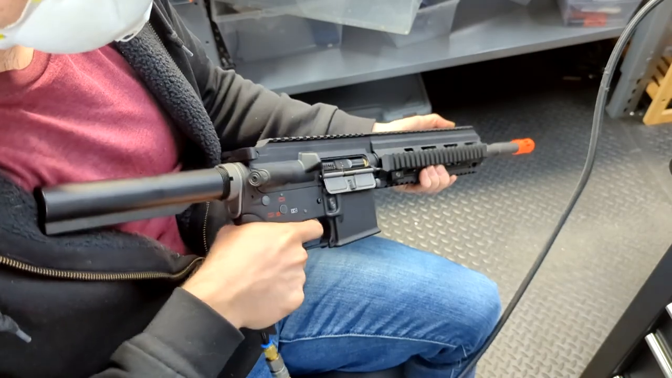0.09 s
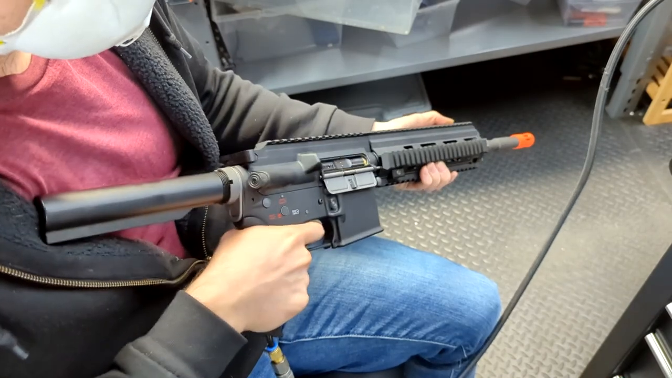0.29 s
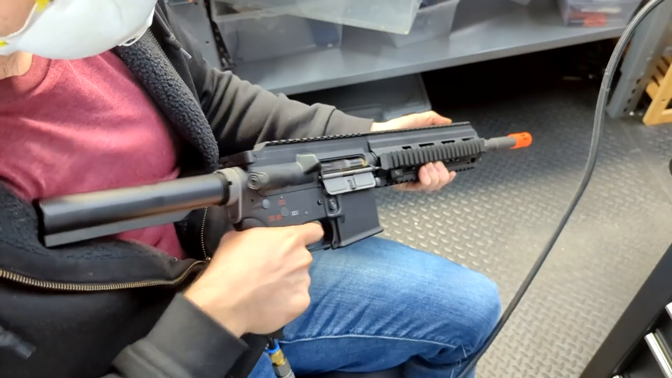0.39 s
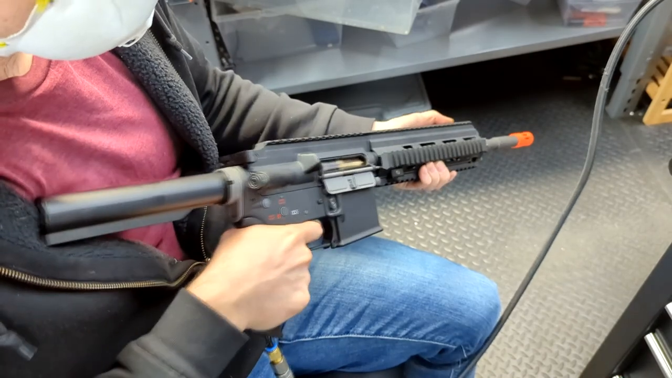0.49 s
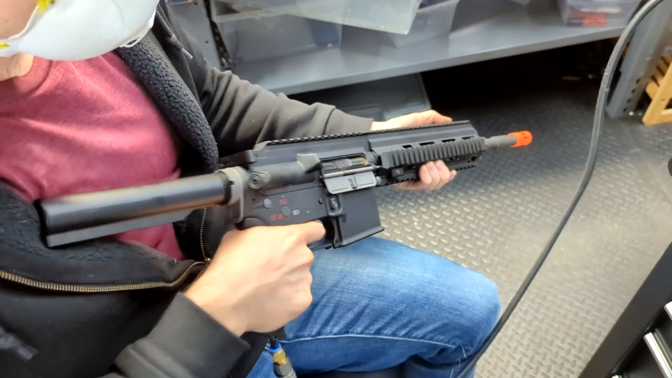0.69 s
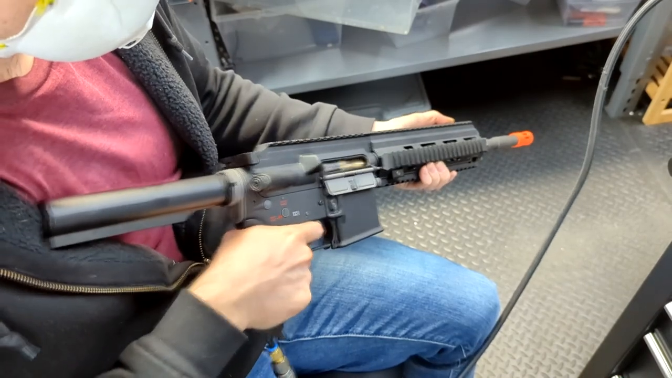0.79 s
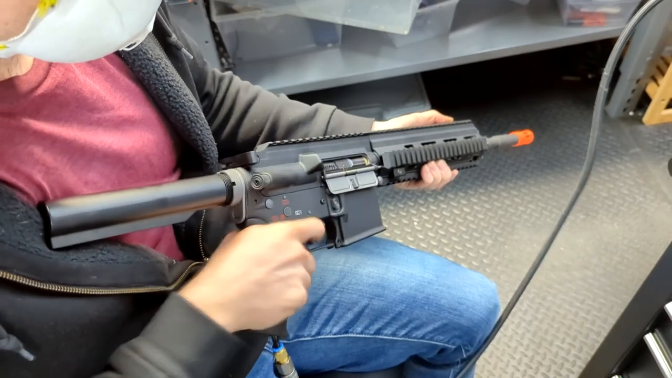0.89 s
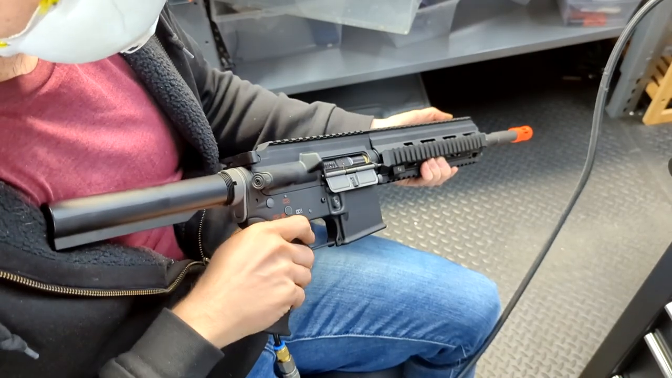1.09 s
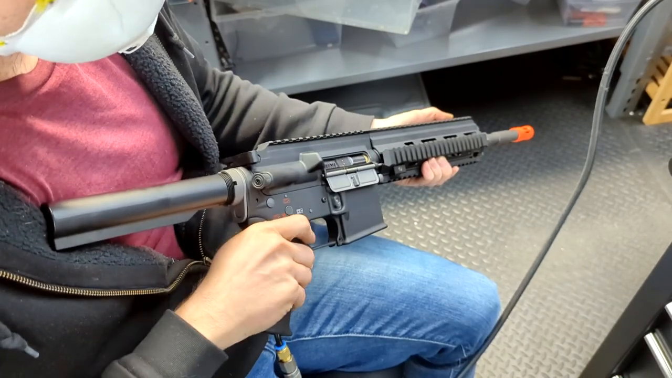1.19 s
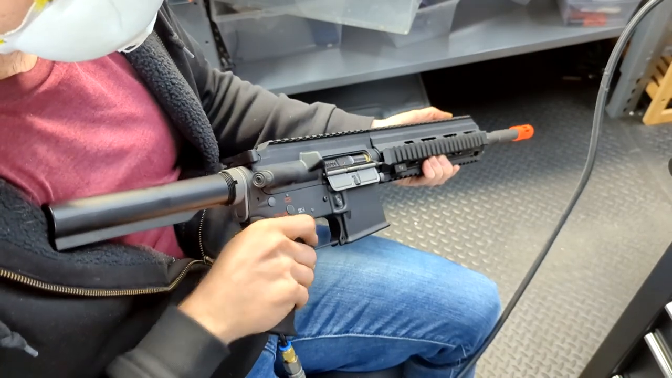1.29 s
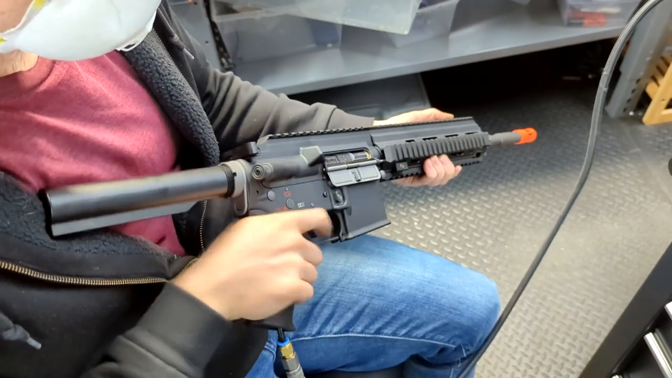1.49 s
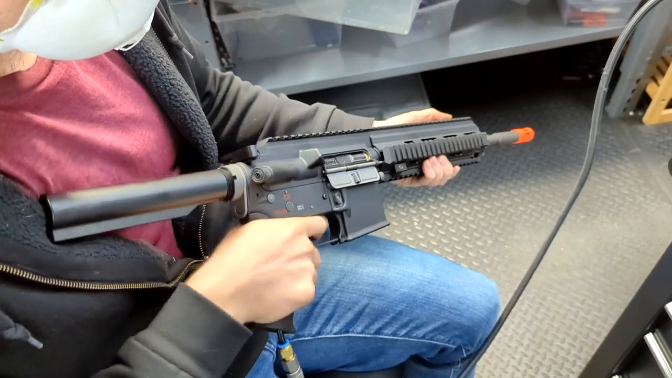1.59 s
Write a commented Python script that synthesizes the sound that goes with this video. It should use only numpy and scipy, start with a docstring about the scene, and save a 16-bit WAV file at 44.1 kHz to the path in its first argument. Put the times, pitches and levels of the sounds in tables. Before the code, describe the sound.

A gas airsoft rifle, close to a stereo microphone in a hard indoor workshop, clicks at the trigger, rattles off five even pops with metallic bolt clatter, then echo fades and the trigger clicks again.

```python
"""Five sharp pops in quick succession: a gas blowback airsoft rifle on full auto, close by in a hard-walled
workshop. Each pop is a noise crack with a big echo, two low sine surges of gas under it, and a clatter of
hammer and bolt made of noise bursts, ringing metal modes and dull knocking modes. Small trigger clicks come
before and after the shots. A faint hum, handling bumps and low room noise lie underneath. The recorder's
limiter ducks at every pop and lets go slowly, so the room's echo swells between the shots."""
import sys
import numpy as np
from scipy import signal
from scipy.fft import rfft, irfft, next_fast_len
from scipy.io import wavfile
from scipy.ndimage import uniform_filter1d, minimum_filter1d

SR = 44100
rng = np.random.default_rng(int(sys.argv[2]) if len(sys.argv) > 2 else 0)


def waveform_to_disk(signal):
    """Save audio, clipped to [-1, 1], as 16-bit WAV at the path in sys.argv[1]."""
    frames = np.transpose(np.atleast_2d(signal))
    scaled = np.clip(frames, -1, 1) * 32767
    samples = np.round(scaled).astype(np.int16)
    wavfile.write(sys.argv[1], SR, samples)


N = 70560  # length in samples

# the five shots: t/s, level/dB (the thumps and the action follow them too)
SHOT_TIMES = [(0.2389, -4.5), (0.4031, -4.5), (0.5525, -6), (0.7011, -6), (0.8508, -5.5)]
# colour of the direct pop: f/Hz, level/dB
POP_COLOUR = [(40, -40), (100, -37), (300, -4.5), (700, -0.5), (1500, 4.5), (3000, 7.5), (5000, -9.5),
              (6500, 3), (9500, -12), (12000, -5.5), (16000, 8)]
# colour of the muzzle blast as the room returns it: f/Hz, level/dB
BLAST_ECHO_COLOUR = [(40, -39), (80, -29.5), (125, -21), (185, -6), (300, -4), (500, -4.5), (750, -7.5),
                     (1000, -4), (1400, 1), (2100, 6.5), (2450, 2.5), (2900, 6), (3250, 3.5), (3800, 7),
                     (4900, 1.5), (5500, 1.5), (6400, 7), (7100, 1.5), (7700, 4.5), (9500, -1.5),
                     (12000, -1), (13300, -3), (15500, -7.5)]
POP_DB, POP_T60_S = 0.5, 0.012
ECHO_DB, ECHO_SHARED = 22, 0.48  # the second is the share of echo energy that repeats at every shot


def muzzle():
    """Gas bursts from a muzzle aimed away from the microphone: a short crack and a louder, partly repeating echo."""
    out = np.zeros((2, N))
    shared_echo = room_tail(BLAST_ECHO_COLOUR)
    for shot_s, shot_db in SHOT_TIMES:
        own_echo = room_tail(BLAST_ECHO_COLOUR)
        echo = np.sqrt(ECHO_SHARED) * shared_echo + np.sqrt(1 - ECHO_SHARED) * own_echo
        pop = burst(POP_COLOUR, POP_T60_S)
        add(out, shot_s, amp(shot_db + POP_DB) * pop + amp(shot_db + ECHO_DB) * echo)
    return out


# low surges of gas in every shot: t/s after the pop, f/Hz, level/dB, half length/s (to 1/e)
GAS_SURGES = [(.0047, 274, -15, 0.0024), (.0092, 259, -15, 0.0017)]


def thumps():
    """Two quick surges of gas, as short sine pushes, give each shot its low punch."""
    t = np.arange(N) / SR
    punch = np.zeros(N)
    for shot_s, shot_db in SHOT_TIMES:
        for delay_s, hz, surge_db, half_s in GAS_SURGES:
            punch += amp(shot_db + surge_db) * bump(t - shot_s - delay_s, hz, half_s)
    return np.array([punch, punch])


# contacts of hammer and bolt in every cycle: nominal t/s after the pop, metal clack level/dB, dull knock
# level/dB, clack noise t60/s
CYCLE_CONTACTS = [(-.0125, -27.5, -52, .04), (-.0085, -23.5, -41, .035), (.003, -11, -17.5, 0.032),
                  (.011, -17.5, -15.5, 0.026), (.021, -10, -23, 0.037), (0.034, -9.5, -10.5, 0.017),
                  (.039, -14.5, -28, .02), (.0437, -8.5, -15.5, .025), (.061, -11.5, -42.5, .06),
                  (.083, -29, -39, 0.1), (.130, -33.5, -53, 0.063)]
# colour of the clack noise: f/Hz, level/dB
CLACK_COLOUR = [(40, -46.5), (200, -28), (1000, -4), (2200, 8), (3200, 2.5), (5000, 3.5), (7500, 6.5),
                (9500, 2), (11700, 4.5), (16000, -3.5)]
# receiver and bolt ring: nominal f/Hz, level/dB, t60/s
METAL_MODES = [(1967, -9.5, 0.12), (2203, 3.5, .12), (2720, -2.5, .12), (3030, -3.5, 0.088),
               (3426, 0.5, 0.16), (4007, -19, .15), (3960, -6, .15), (6340, -2, 0.05), (7760, 2.5, 0.16)]
# the dull knock of each contact, with fixed low-mid peaks: nominal f/Hz, level/dB, t60/s
KNOCK_MODES = [(214, -23, 0.058), (356, -28.5, 0.02), (689, -10, 0.028), (800, -7.5, .018),
               (880, -7.5, 0.017), (1127, -13.5, 0.058), (1361, -9, 0.037), (1660, -9, 0.021)]
METAL_RING_DB = -28.5  # against the clack noise
KNOCK_RISE_S, CONTACT_JITTER_S = 0.00075, 0.0003


def action():
    """The hammer falls, the bolt flies back, hits its stop and runs home: each contact clacks, rings and knocks."""
    out = np.zeros((2, N))
    soft_onset = 1 - np.exp(-clock() / KNOCK_RISE_S)
    for shot_s, shot_db in SHOT_TIMES:
        for delay_s, clack_db, knock_db, t60_s in CYCLE_CONTACTS:
            clack_noise = burst(CLACK_COLOUR, t60_s)
            # each channel gets its own random polarity
            metal = amp(METAL_RING_DB) * ring(METAL_MODES) * rng.choice([-1, 1], (2, 1))
            clack = amp(shot_db + clack_db) * (clack_noise + metal)
            contact_s = shot_s + delay_s + rng.normal(0, CONTACT_JITTER_S)
            knock = amp(shot_db + knock_db) * soft_onset * ring(KNOCK_MODES)
            add(out, contact_s, clack + knock)
    return out


# trigger and sear clicks: t/s, level/dB, left over right/dB, noise t60/s
TRIGGER_CLICKS = [(0.2037, -47, -7, 0.017), (0.2069, -36, -2, 0.019), (0.2093, -41, 9.5, 0.13),
                  (1.3238, -59, -1, 0.11), (1.3908, -45, 2, 0.028), (1.3992, -36.5, 1, 0.028)]
# colour of the click noise: f/Hz, level/dB
CLICK_COLOUR = [(50, -40), (300, -19), (1200, -12.5), (2200, -12.5), (2800, 3), (3600, -2.5), (5000, -5.5),
                (7500, -5.5), (11000, -5), (16000, -8.5)]
# brief ring of the small trigger parts: nominal f/Hz, level/dB, t60/s
SEAR_MODES = [(2870, -18, 0.019), (3030, -30.5, .035), (3605, -16.5, 0.054), (3660, -24, 0.036),
              (11500, -15.5, .03)]


def trigger():
    """Small steel parts click and scrape as the trigger breaks and later resets: noise plus a brief ring."""
    out = np.zeros((2, N))
    for click_s, click_db, pan_db, t60_s in TRIGGER_CLICKS:
        click = burst(CLICK_COLOUR, t60_s) + ring(SEAR_MODES)
        channel_db = click_db + pan_db * np.array([[0.5], [-0.5]])
        add(out, click_s, amp(channel_db) * click)
    return out


# soft handling bumps: t/s, f/Hz, level/dB, half length/s (to 1/e)
HANDLING_BUMPS = [(0.066, 93.6, -45, 0.019), (0.123, 250, -61.5, 0.029), (0.137, 65, -54, 0.046),
                  (.205, 94.4, -53.5, 0.027), (0.32, 90, -41.5, 0.0049), (1.058, 87, -56, .022),
                  (1.521, 239, -61, 0.028)]
# colour of the room noise: f/Hz, level/dB
FLOOR_COLOUR = [(25, 4.5), (70, 0.5), (120, -4.5), (170, -2.5), (280, 2.5), (450, -3), (750, -4.5),
                (1300, -12.5), (2200, -7.5), (4000, -24), (8000, -31.5), (15000, -49)]
FLOOR_START_DB, FLOOR_FADE_DB_PER_S = -60.5, 1.5
HUM_HZ, HUM_START_DB, HUM_FADE_DB_PER_S = 165, -62, 10.5


def background():
    """Low room noise, a faint fading sine hum and soft bumps of the rifle being held."""
    t = np.arange(N) / SR
    bumps = sum(amp(db) * bump(t - bump_s, hz, half_s) for bump_s, hz, db, half_s in HANDLING_BUMPS)
    hum = amp(HUM_START_DB - HUM_FADE_DB_PER_S * t) * np.sin(2 * np.pi * HUM_HZ * t)
    floor = amp(FLOOR_START_DB - FLOOR_FADE_DB_PER_S * t) * noise(FLOOR_COLOUR, N)
    return bumps + hum + floor


# decay of the workshop's echo: f/Hz, t60/s
ROOM_DECAY = [(100, 0.17), (200, 0.46), (530, 0.32), (1400, 0.36), (3700, 0.44), (9700, .31), (16000, 0.25)]
ROOM_GAP_S, ROOM_BUILD_S = 0.001, 0.01


def room_tail(spectrum=((1, 0), (2, 0))):
    """The workshop's answer, of mean energy 1 per channel: it builds up, then each frequency dies at its own speed."""
    t = clock()
    hz, frame_s, cells = signal.stft(noise(spectrum, len(t)), SR, nperseg=256)
    decay = amp(-60 * frame_s / along(ROOM_DECAY, hz)[:, None])
    tail = signal.istft(cells * decay, SR, nperseg=256)[1][:, :len(t)]
    tail = tail * (1 - np.exp(-np.maximum(t - ROOM_GAP_S, 0) / ROOM_BUILD_S))
    return unit(tail) / np.sqrt(len(t))


def in_room(x, tail, wet_db):
    """A sound with its echo, made by convolving it with the room tail."""
    return x + amp(wet_db) * signal.fftconvolve(x, tail, axes=1)[:, :N]


CRACK_RISE_S = 0.00014


def burst(spectrum, t60_s):
    """A crack of noise: near-instant rise, exponential decay."""
    t = clock()
    return noise(spectrum, len(t)) * (1 - np.exp(-t / CRACK_RISE_S)) * amp(-60 * t / t60_s)


def ring(modes):
    """Damped sine modes, each a little different in level and pitch at every blow."""
    t = clock()
    total = np.zeros(len(t))
    for hz, db, t60_s in modes:
        envelope = amp(db + rng.normal(0, 3.2) - 60 * t / t60_s)
        total += envelope * np.sin(2 * np.pi * hz * (1 + rng.normal(0, 0.00099)) * t)
    return total


def bump(t, hz, half_s):
    """A soft low push: a sine under a bell-shaped envelope centred on t = 0."""
    return np.exp(-(t / half_s) ** 2) * np.sin(2 * np.pi * hz * t)


# stereo width of all noise: f/Hz, left-right likeness (1 = mono, 0 = unrelated)
STEREO_LIKENESS = [(60, 1), (130, 0.9), (290, 0.92), (640, 0.34), (1400, 0.053), (3000, 0.02),
                   (15000, 0.046)]


def noise(spectrum, size):
    """Coloured stereo noise of rms 1, near mono in the bass, mixed from independent mid and side."""
    def mid_side_gains(hz):
        angle = np.arccos(np.clip(along(STEREO_LIKENESS, hz), -1, 1)) / 2
        return amp(along(spectrum, hz)) * [np.cos(angle), np.sin(angle)]

    mid, side = filtered(rng.standard_normal((2, size)), mid_side_gains)
    return unit(np.array([mid + side, mid - side]))


def filtered(x, response):
    """Shape x in the frequency domain by a gain curve over Hz."""
    size = next_fast_len(x.shape[-1] + SR // 10)
    hz = np.fft.rfftfreq(size, 1 / SR)
    return irfft(rfft(x, size) * response(hz), size)[..., :x.shape[-1]]


def along(points, hz):
    """Interpolate (Hz, value) points on a log frequency axis."""
    f, v = np.transpose(points)
    return np.interp(np.log(hz + 1), np.log(f + 1), v)


def add(track, start_s, x):
    """Mix x into the track from start_s on."""
    i = int(round(start_s * SR))
    track[:, i:i + x.shape[-1]] += x[..., :N - i]


def clock():
    """Time in seconds over the 0.8 s life of one event."""
    return np.arange(int(0.8 * SR)) / SR


def amp(db):
    """Decibels to linear gain."""
    return 10 ** (np.asarray(db) / 20)


def unit(x):
    """Scale to rms 1."""
    return x / np.sqrt(np.mean(x ** 2) + 1e-20)


# stereo lean of the rifle: f/Hz, right over left/dB
RIFLE_LEAN = [(100, 1), (700, 1.2), (1400, 2), (4400, 4), (8000, -0.5), (15000, -1)]
SURGE_WET_DB, ACTION_WET_DB, CLICK_WET_DB = -15, -5.5, -9  # echo levels


def scene():
    """The rifle, mostly a little to the right, in its room, with trigger clicks and background."""
    tail = room_tail()
    rifle = muzzle()
    rifle = rifle + in_room(thumps(), tail, SURGE_WET_DB)
    rifle = rifle + in_room(action(), tail, ACTION_WET_DB)
    rifle = filtered(rifle, lambda hz: amp(along(RIFLE_LEAN, hz) * np.array([[-0.5], [0.5]])))
    return rifle + in_room(trigger(), tail, CLICK_WET_DB) + background()


LIMIT_DB, SENSE_S, AHEAD_S, RELEASE_DB_PER_S = -20.5, 0.0038, 0.011, 136
LOW_CUT_HZ, TOP_HZ, TOP_ORDER = 75, 15900, 90


def record(dry):
    """A look-ahead limiter with a slow release, then a low cut and a steep band limit."""
    power = np.abs(uniform_filter1d(np.mean(dry ** 2, axis=0), int(SENSE_S * SR)))
    over_db = np.maximum(10 * np.log10(power + 1e-12) - LIMIT_DB, 0)
    # the held reduction jumps up with the level and falls back at the release rate
    release_db = RELEASE_DB_PER_S * np.arange(N) / SR
    held_db = np.maximum.accumulate(over_db + release_db) - release_db
    ahead = int(AHEAD_S * SR)
    gain_db = uniform_filter1d(minimum_filter1d(-held_db, ahead), ahead)

    def band(hz):
        low_cut = hz ** 2 / np.hypot(hz ** 2, LOW_CUT_HZ ** 2)
        return low_cut / np.hypot(1, (hz / TOP_HZ) ** TOP_ORDER)

    return filtered(dry * amp(gain_db), band)


dry = scene()
out = record(dry)
waveform_to_disk(out)
```